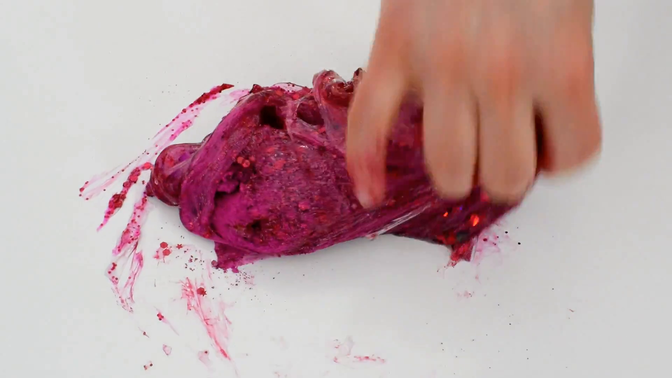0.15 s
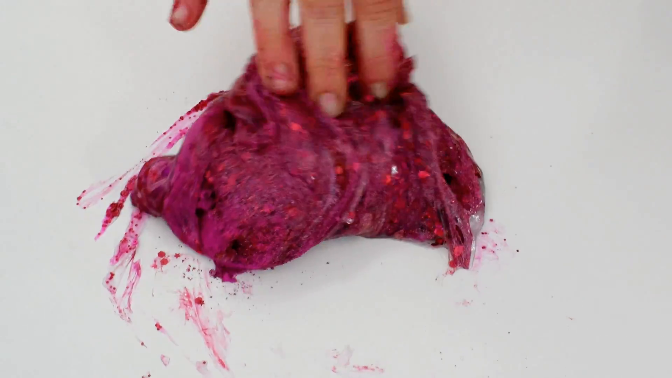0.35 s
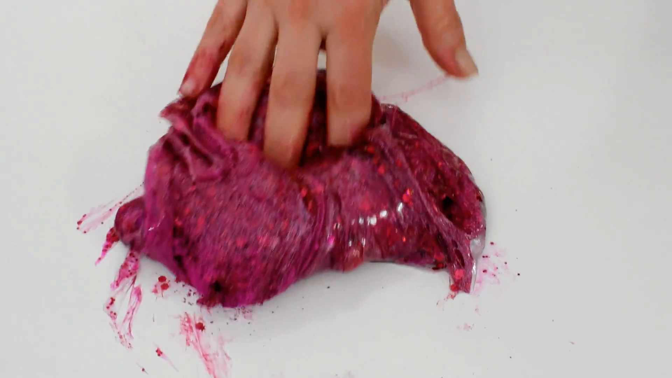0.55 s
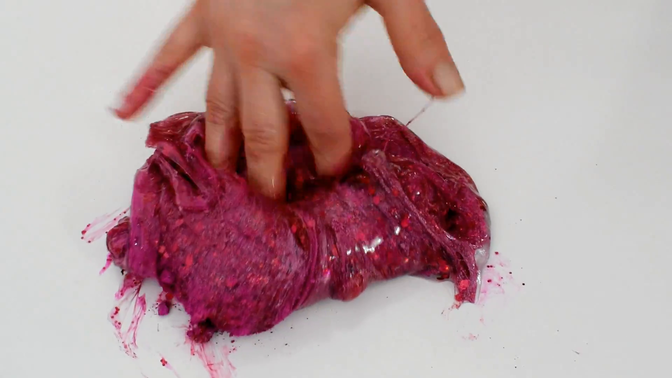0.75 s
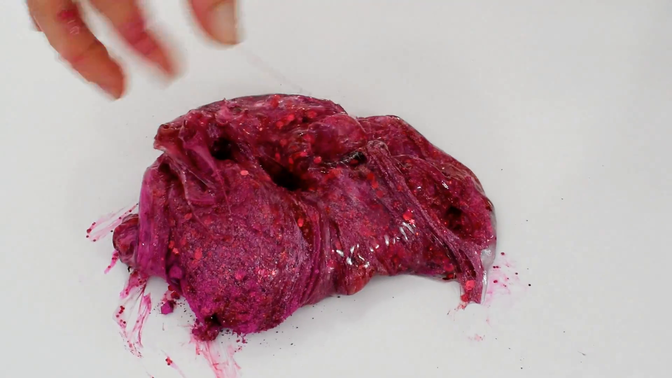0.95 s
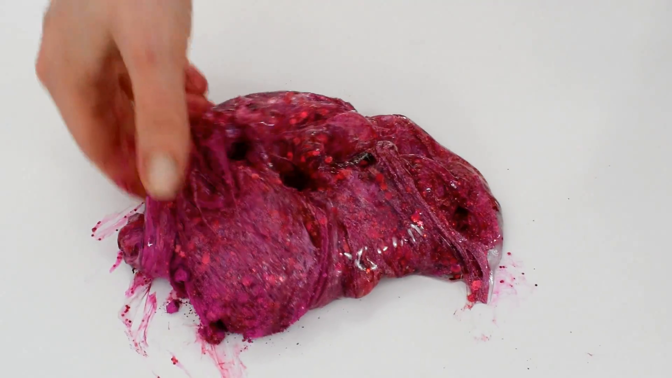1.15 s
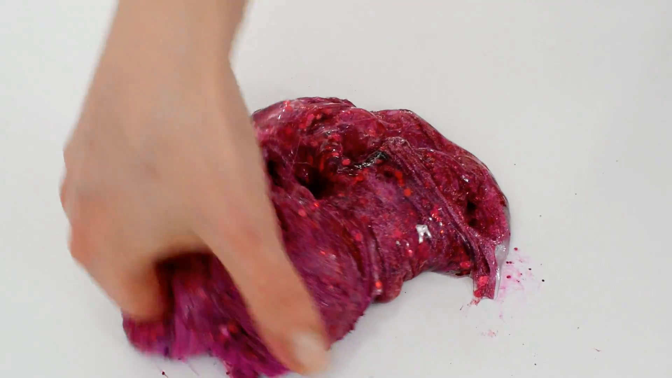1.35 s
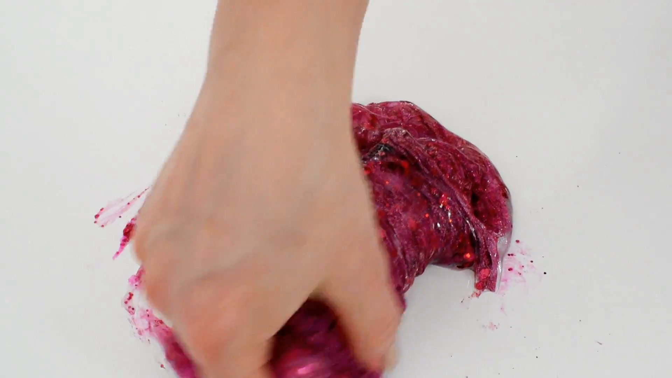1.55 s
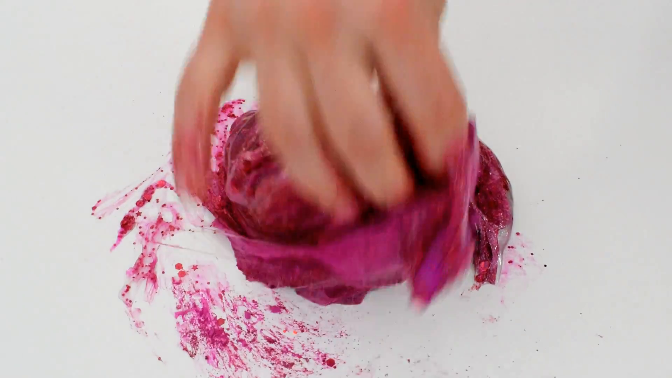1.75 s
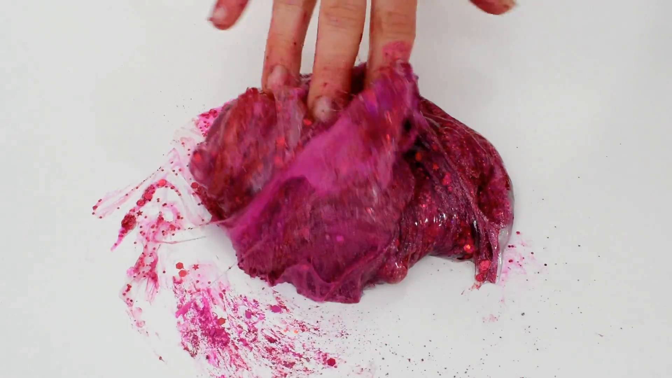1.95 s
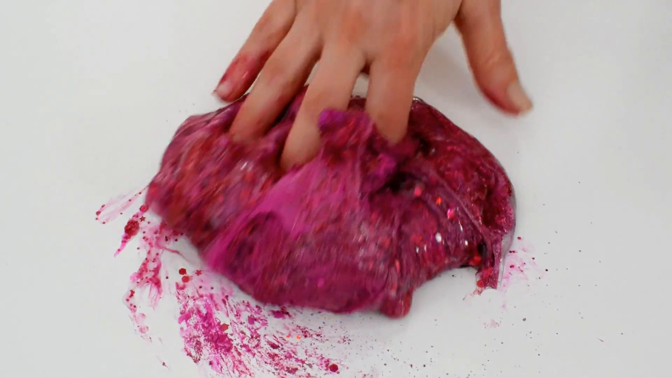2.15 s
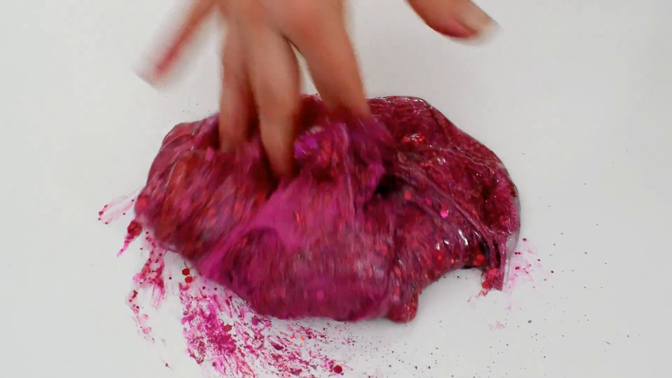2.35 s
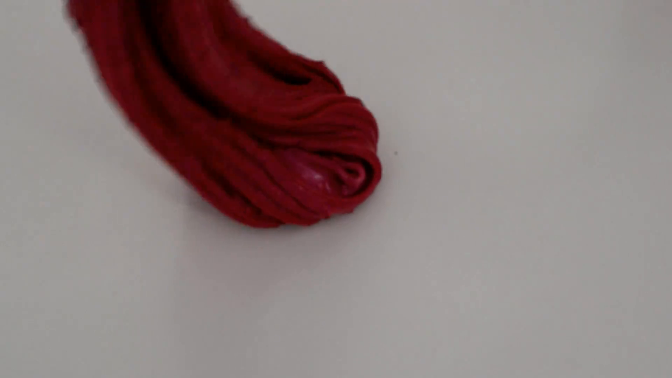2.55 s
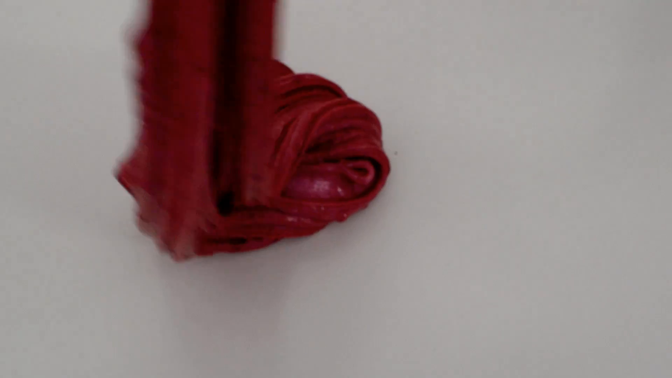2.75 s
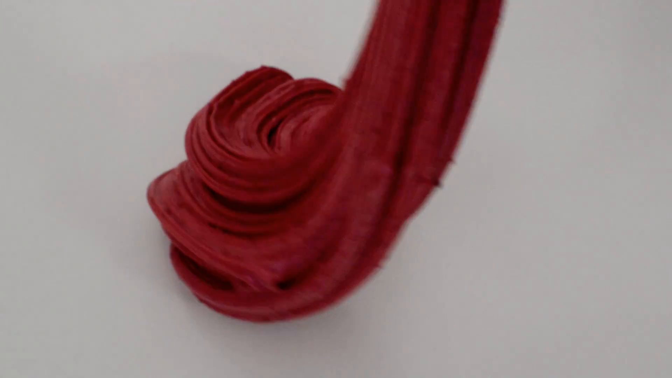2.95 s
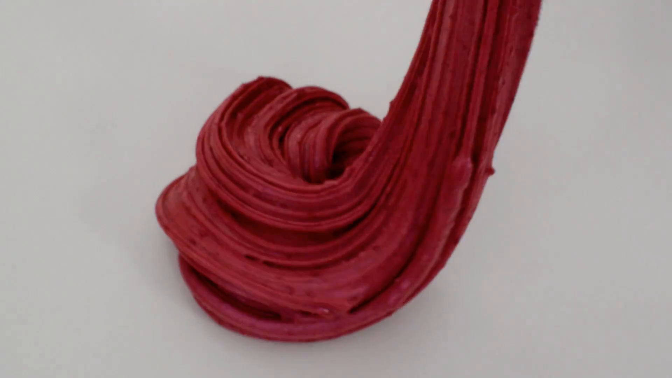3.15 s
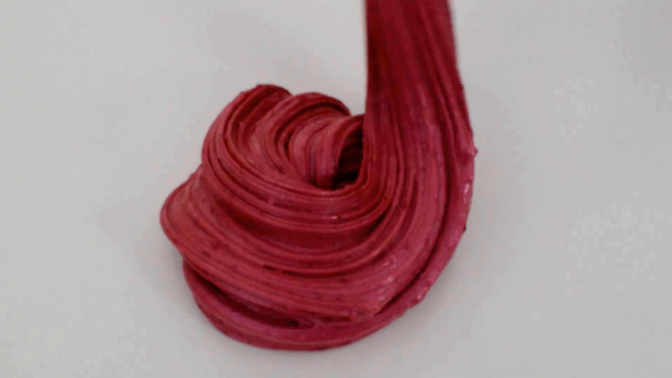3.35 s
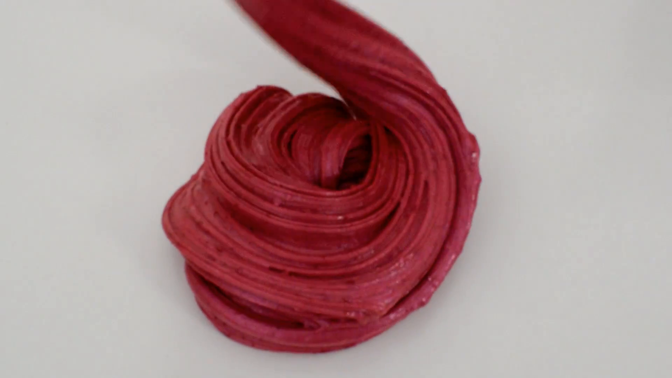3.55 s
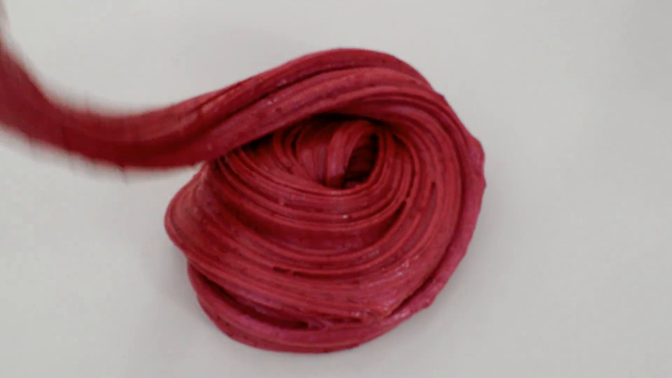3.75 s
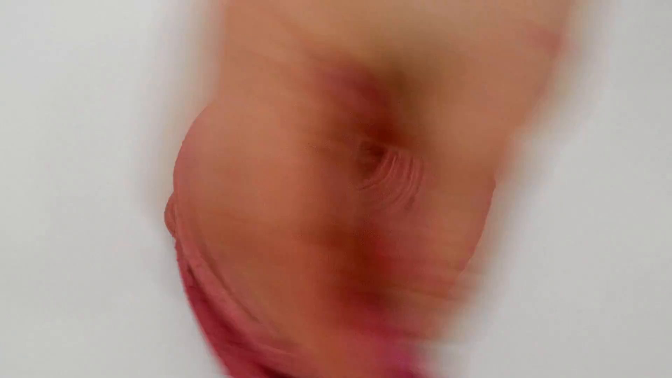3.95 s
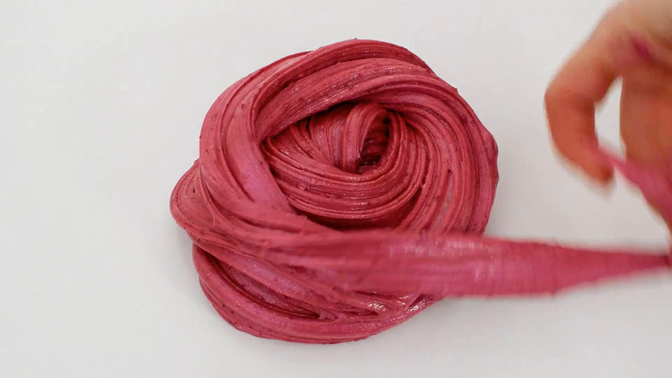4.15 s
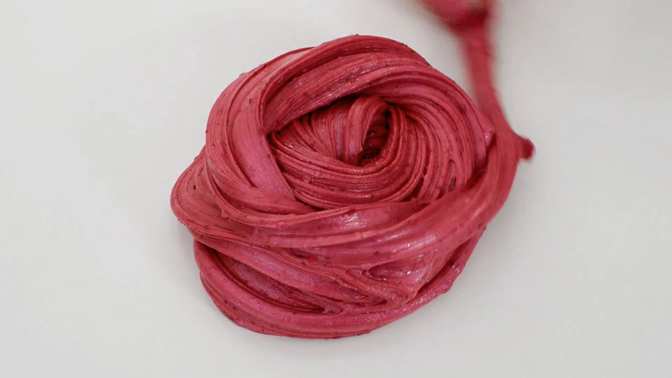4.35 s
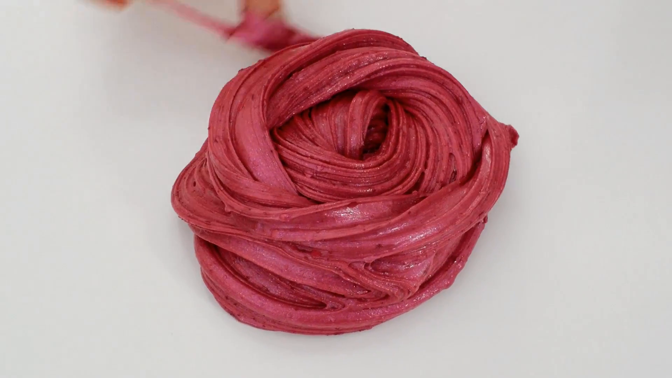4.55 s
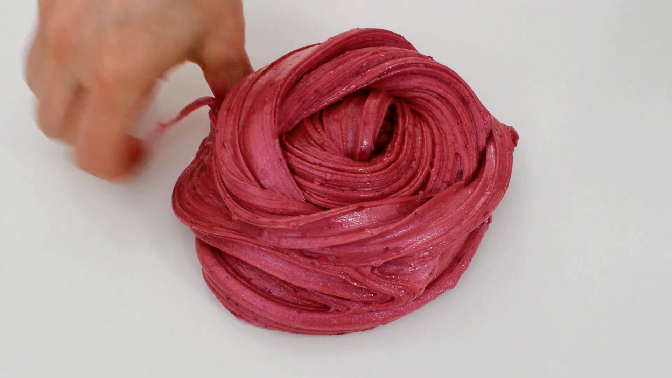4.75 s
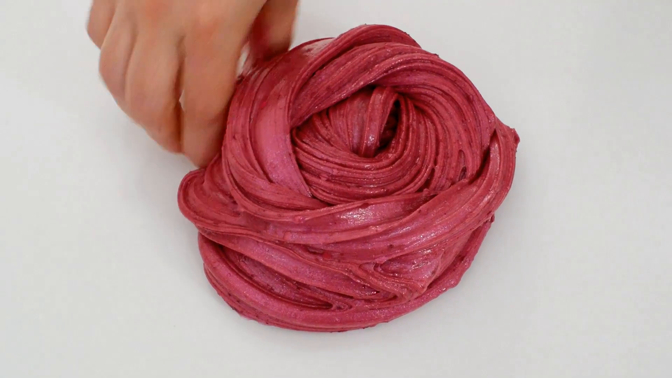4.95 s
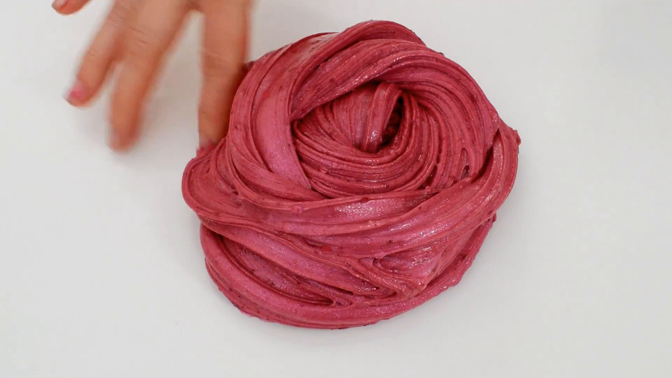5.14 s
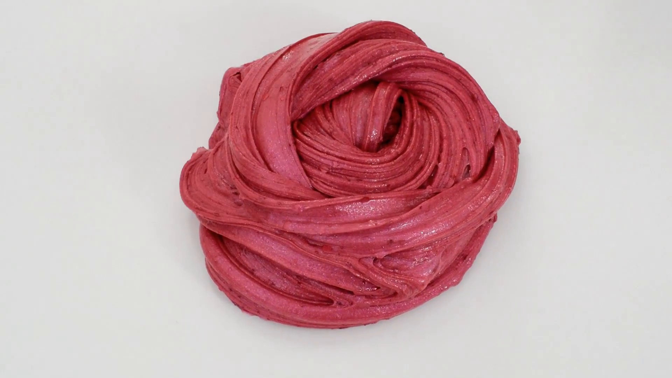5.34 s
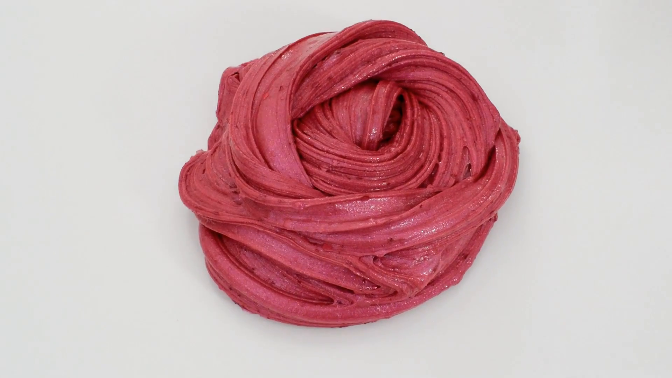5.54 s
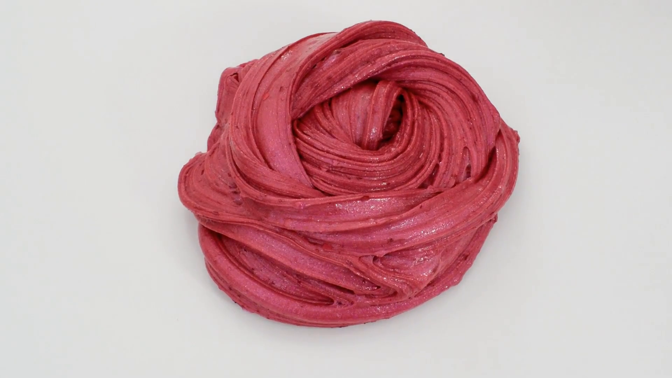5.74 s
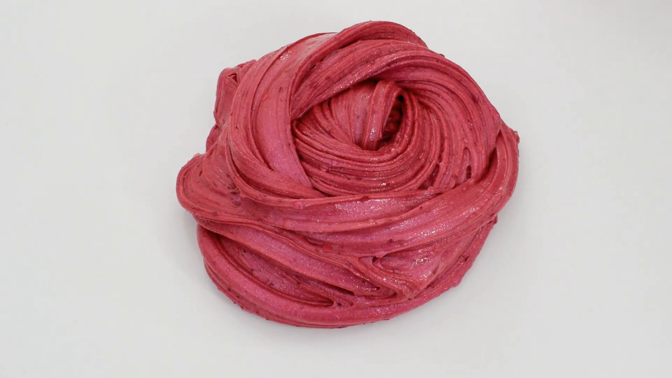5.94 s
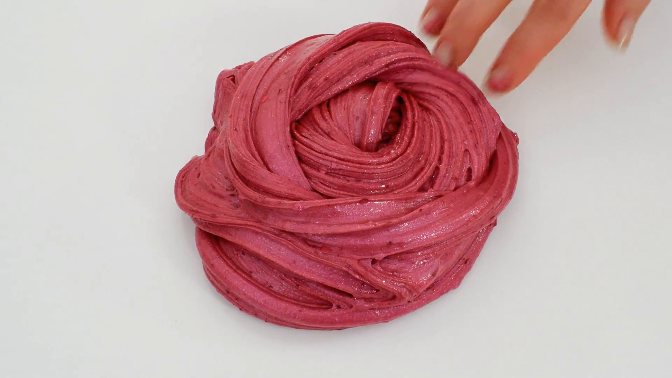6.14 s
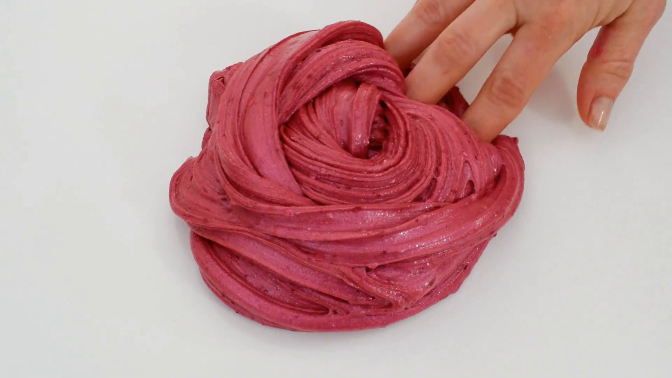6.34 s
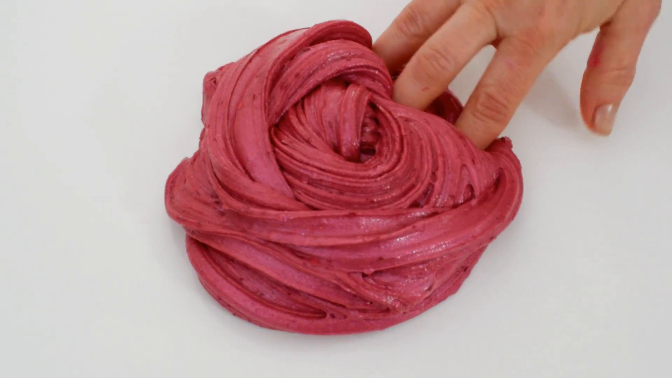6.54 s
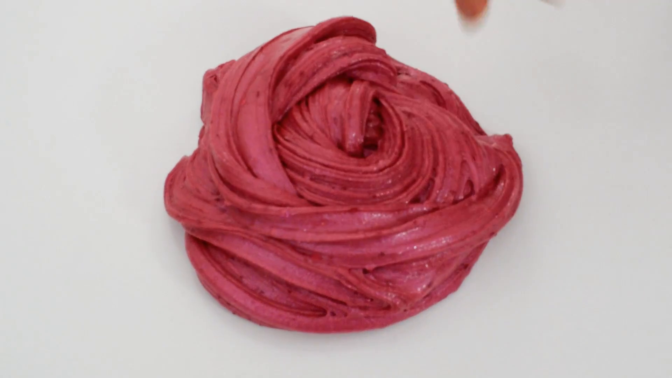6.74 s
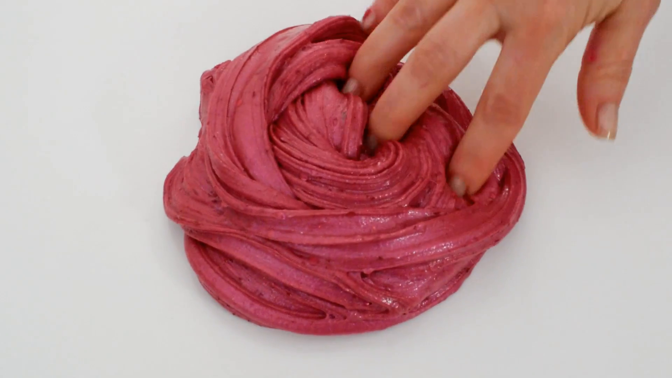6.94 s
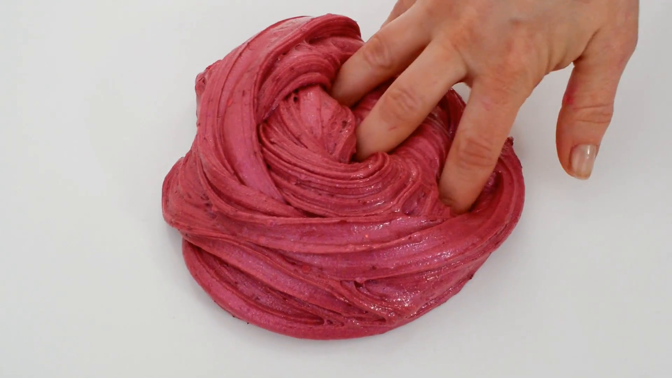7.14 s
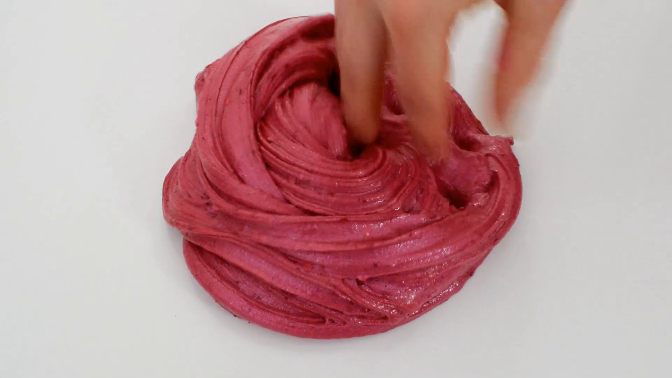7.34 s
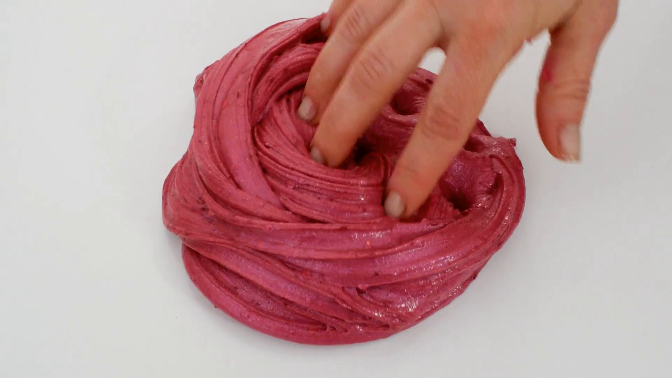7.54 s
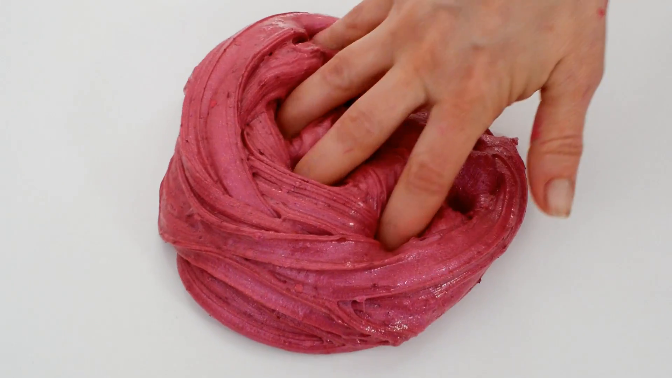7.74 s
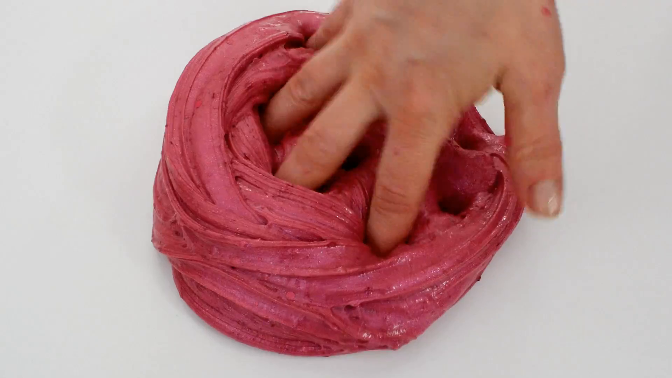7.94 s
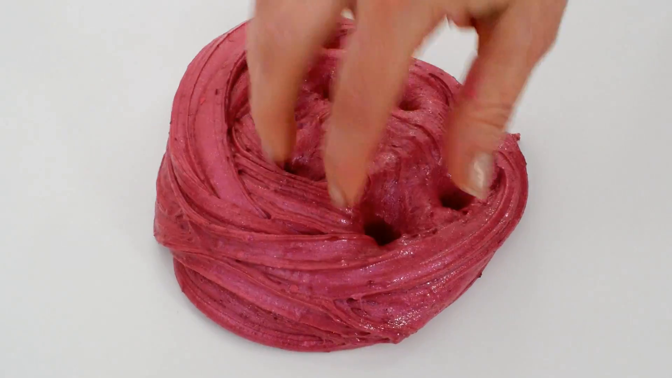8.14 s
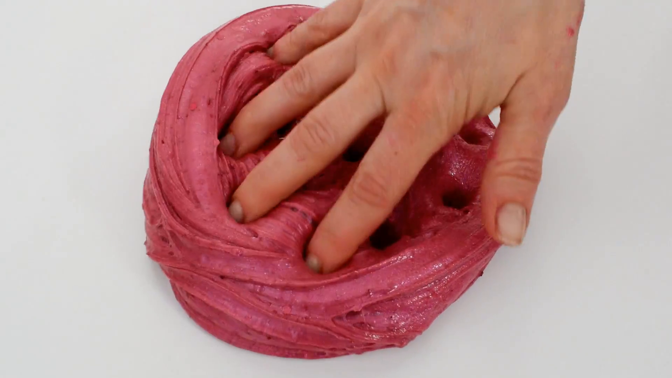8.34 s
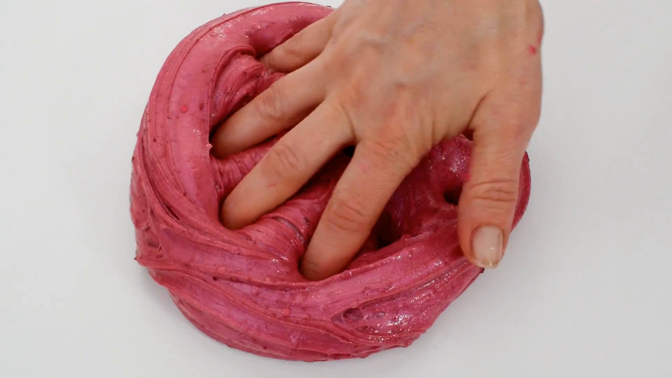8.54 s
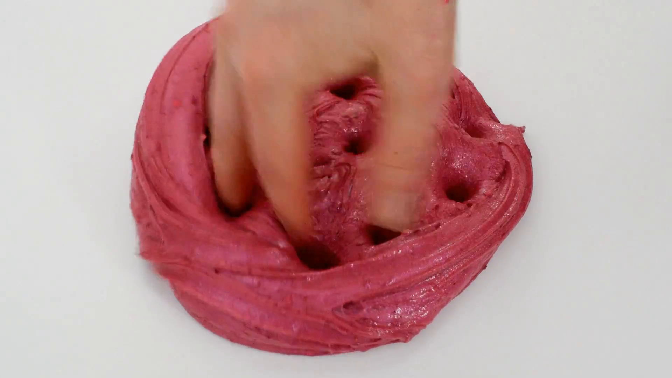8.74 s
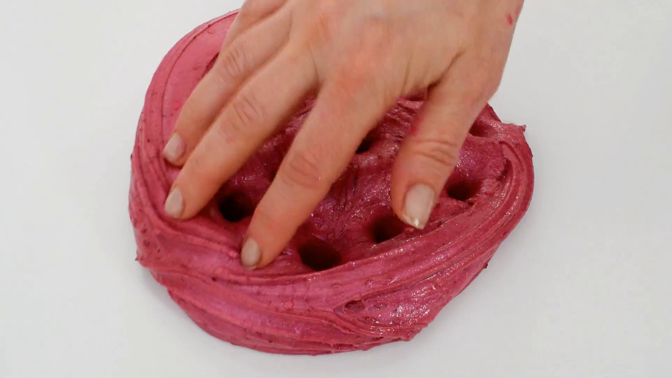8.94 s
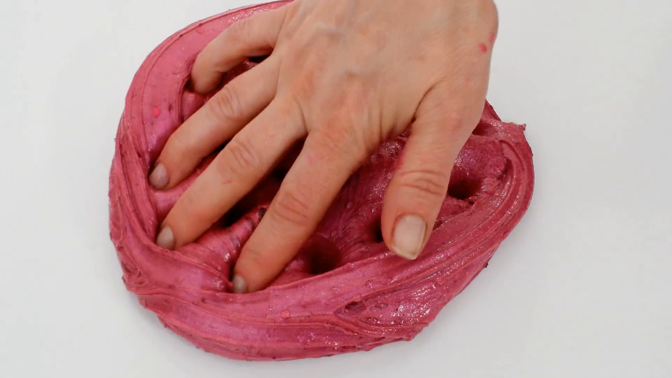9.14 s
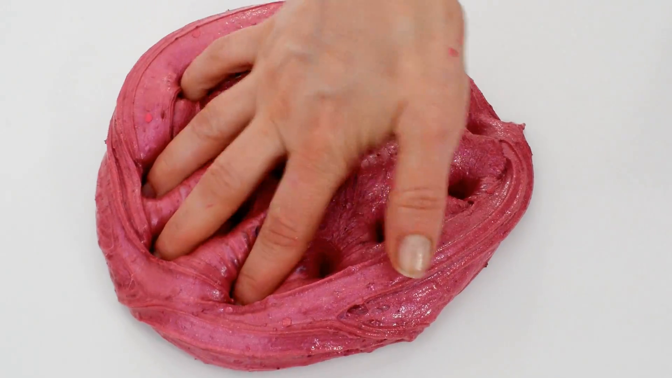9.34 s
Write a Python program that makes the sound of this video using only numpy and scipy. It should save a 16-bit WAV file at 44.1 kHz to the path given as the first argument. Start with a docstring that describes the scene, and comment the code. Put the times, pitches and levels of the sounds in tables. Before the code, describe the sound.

A hand kneads and peels sticky slime on a table in a small dry room, giving irregular sharp pops and fine crackles. After a nearly silent gap come softer sticky snaps, then four very loud wet smacks as fingers pull from deep holes, with dull thuds. Faint air noise and machine hum run beneath; two close spaced microphones.

```python
"""Wet, sticky slime crackles, pops and smacks as hands knead, stretch and poke it on a table in a small dry room.
Bubbles pop as a snapped film and a ringing cavity; tacky film peeling off is a crackle of random tiny breaks.
Four times fingers pull out of deep holes: torn noise, cavity rings and gulps smack loudly enough to overload.
Pushes sway the table in low fading sines, bumps knock dully, and air noise and a machine hum lie beneath.
Two spaced microphones hear each spot through its own direct sound, table bounce, hand scatter and room."""
import sys
import numpy as np
from scipy import signal
from scipy.fft import rfft, irfft
from scipy.io import wavfile

SR = 44100
rng = np.random.default_rng(int(sys.argv[2]) if len(sys.argv) > 2 else 0)


def store_pcm(level_fs):
    """Save levels as 16-bit WAV."""
    pcm = np.round(np.clip(level_fs, -1, 1) * 32767).astype(np.int16)
    wavfile.write(sys.argv[1], SR, np.atleast_2d(pcm).T)


N = 414099
T = np.arange(N) / SR  # time [s]
SHORT = T[:2048]  # time axis of one brief sound [s]
FIRM_DB = -59.5  # crackle level of a firm stroke [dB]


def undb(db):
    """Decibels to gain."""
    return 10 ** (np.asarray(db) / 20)


def unit(x):
    """Scale to an energy of one."""
    return x / np.sqrt(np.sum(x ** 2) + 1e-18)


def level(x, db):
    """Scale to an rms level."""
    return x * undb(db) / np.sqrt(np.mean(x ** 2))


def add(track, s, sound):
    """Mix a sound into a track at a time."""
    i = max(int(s * SR), 0)
    track[..., i:i + sound.shape[-1]] += sound[..., :max(N - i, 0)]


def at_hz(points, hz):
    """Read (frequency [Hz], value) points on a log-frequency axis."""
    f, value = np.transpose(points)
    return np.interp(np.log(hz + 1e-3), np.log(f), value)


def colour(x, points, size=8192):
    """Causal filter of unit energy with the given spectrum, built from its cepstrum."""
    spectrum = undb(at_hz(points, np.fft.rfftfreq(size, 1 / SR)))
    cepstrum = irfft(np.log(spectrum))
    # folding the cepstrum onto positive time makes the filter minimum-phase
    cepstrum[1:size // 2] *= 2
    cepstrum[size // 2 + 1:] = 0
    response = unit(irfft(np.exp(rfft(cepstrum))))
    return signal.oaconvolve(x, response)[:len(x)]


def modes(table, t):
    """A sum of fading sines from rows of (frequency [Hz], level [dB], t60 [s])."""
    total = 0
    for hz, db, t60 in table:
        fade = np.exp(-np.log(1000) * t / t60)
        total = total + undb(db) * np.sin(2 * np.pi * hz * t) * fade
    return total


def ring(hz, cycles, glide=0.):
    """A small resonator that fades in a few cycles; with a glide its pitch rises."""
    age = SHORT * hz / cycles
    pitch = np.minimum(hz * (1 + glide * (np.minimum(age, 2) - .5)), SR / 2)
    phase = 2 * np.pi * np.cumsum(pitch) / SR
    return unit(np.exp(-age) * np.sin(phase))


def rupture(tear_s, rag):
    """A film breaks at once, then its ragged edge tears on for a moment."""
    force = rag * unit(rng.standard_normal(len(SHORT)) * np.exp(-SHORT / tear_s))
    force[0] = 1
    return force


def strike(force, body):
    """A body's answer to a force, with an energy of one."""
    return unit(signal.oaconvolve(force, body)[:len(force)])


def tap(x, ms):
    """The same short sound, a little later."""
    return np.roll(x, int(abs(ms) * SR / 1000))


def near_field(lag_ms, bounce_ms, bounce_db, scatter_db):
    """Direct sound, a bounce off the table top, and scatter from a hand that never lies the same way twice."""
    direct = 1. * (SHORT == 0)
    scatter = unit(rng.standard_normal(len(SHORT)) * SHORT * np.exp(-SHORT / 0.0011))
    bounce = tap(direct, bounce_ms * np.exp(0.14 * rng.standard_normal()))
    path = direct + undb(bounce_db) * bounce + undb(scatter_db) * scatter
    return tap(unit(path), lag_ms)


def place(x):
    """A sound from one spot on the slime: rows for the left microphone, the right one, and the room."""
    left = near_field(lag_ms=0, bounce_ms=0.83, bounce_db=-14, scatter_db=-4.5)
    right_lag_ms = 0.68 + .12 * rng.standard_normal()
    right = near_field(lag_ms=right_lag_ms, bounce_ms=1.3, bounce_db=1.0, scatter_db=-1.5)
    strength = np.sqrt(np.sum(x ** 2))
    return np.array([strike(x, left), strike(x, right), unit(x)]) * strength


def room_tone():
    """Soft air noise, alike on both sides in the bass, and a wavering machine hum."""
    # spectrum of the air noise: (frequency [Hz], relative density [dB per Hz])
    air_spectrum = [(20, -1.5), (40, -2), (70, -10), (100, -5.5), (150, -14.5), (250, -17.5), (450, -25),
                    (900, -26), (2000, -30.5), (4000, -34.5), (10000, -34.5), (16000, -40)]
    # hum of a machine, before the microphone gains: (frequency [Hz], rms level [dB])
    hum_tones = [(91.5, -61.5), (95, -70), (120, -69.5), (242.2, -75), (301.5, -79), (360.7, -71.5)]
    shared = colour(rng.standard_normal(N), air_spectrum)
    bass = signal.sosfilt(signal.butter(1, 900, fs=SR, output="sos"), shared)
    sides = []
    for _ in range(2):
        own = colour(rng.standard_normal(N), air_spectrum)
        sides.append(level(own + .9 * bass, -54.5))
    knots = np.linspace(0, T[-1], num=40)
    hum = 0
    for hz, db in hum_tones:
        waver = np.interp(T, knots, rng.standard_normal(len(knots)))
        hum = hum + level(np.sin(2 * np.pi * hz * T + 1.1 * waver), db)
    return (np.array(sides) + hum) * undb([[-3.0], [2.4]])  # left, right


def room_response():
    """Dense reflections that build up in a few milliseconds; the lows linger in the room's resonances."""
    # decay of the dense reflections: (frequency [Hz], t60 [s])
    decay_times = [(200, 0.41), (550, .32), (1200, 0.13), (3000, 0.14), (8000, .165), (11000, 0.14),
                   (15000, 0.023)]
    # low resonances of the room: (frequency [Hz], relative level [dB], t60 [s])
    resonances = [(207, -6.5, 0.27), (280, -6, 0.18), (351.4, -5, 0.45), (447, -2.5, 0.23),
                  (522, -1.5, 0.4), (568, -2, 0.14), (752, 3, .18)]
    t = T[:SR // 2]
    # noise that fades at its own rate in each frequency band
    hz, age, cells = signal.stft(rng.standard_normal(len(t)), SR, nperseg=128)
    fade = np.exp(-np.log(1000) * age / at_hz(decay_times, hz)[:, None])
    tail = signal.istft(cells * fade, SR)[1][:len(t)]
    build_up = np.clip((t - .003) / 0.0079, 0, 1)
    reflections = undb(-12.5) * unit(tail * build_up)
    return reflections + undb(-27.0) * unit(modes(resonances, t) * build_up)


def table_sway():
    """Soft pushes rock the table, and the microphones with it."""
    # pushes that sway the table: (time [s], relative level [dB])
    pushes = [(0.0, -43), (0.491, -41.5), (0.8, -44.5), (1.148, -44), (2.434, -32), (4.931, -37.5),
              (5.072, -50), (6.278, -48.5), (6.663, -23.5), (7.346, -26.5), (8.035, -21.5), (8.745, -25.5)]
    # the table's sway and low rings: (frequency [Hz], relative level [dB], t60 [s])
    sway_modes = [(21.89, 2.5, 0.93), (37, -16, .45), (47.3, -9.5, 0.95), (61.45, -18, .35),
                  (90, -23.5, .2)]
    out, t = np.zeros(N), T[:SR]
    for s, db in pushes:
        soft_onset = 1 - np.exp(-t / 0.01)
        add(out, s, undb(db) * modes(sway_modes, t) * soft_onset)
    return out * undb([[-2.5], [1.5]])  # left, right


def thuds():
    """The hand bumps the table through the slime, which cushions each bump into a short, dull knock."""
    # bumps: (time [s], energy [dB])
    bumps = [(0.298, -38), (0.821, -14.5), (1.165, -16), (2.377, -18.5), (4.805, -28), (6.655, -7),
             (7.335, -6.5), (8.035, -12), (8.747, -10.5)]
    out = np.zeros((3, N))
    for s, db in bumps:
        add(out, s, place(undb(db) * ring(122, cycles=0.99)))
    return out


def swell(start, length, attack_s, release_s):
    """Attack, hold and release, with exponential flanks."""
    before = np.maximum(start - T, 0)
    after = np.maximum(T - start - length, 0)
    return np.exp(-before / attack_s - after / release_s)


def strokes():
    """Gains of crackle and squish as the hand takes hold, peels steadily and lets go."""
    # strokes that peel slime off skin or table:
    # (start [s], length [s], relative fine crackle level [dB], relative duller squish level [dB])
    peel_strokes = [(0.006, .045, -61, -55.5), (0.064, .055, -67, -60), (0.231, .17, -72, -70),
                    (0.777, 0.037, -62, -65.5), (0.836, 0.016, -45, -50.5), (1.215, .28, -58.5, -64),
                    (1.566, .13, -60, -59), (1.758, .2, -74.5, -70.5), (2.023, .18, -70.5, -67.5),
                    (2.366, 0.023, -58.5, -50.5), (2.425, .06, -68, -68.5), (4.082, 0.18, -71.5, -63.5),
                    (4.269, .04, -58, -56), (4.325, 0.12, -57.5, -51), (4.753, .12, -70.5, -65),
                    (4.937, 0.072, -58, -56.5), (5.182, 0.0095, -51.5, -54)]
    gains = np.full((2, N), 1e-6)
    for s, length, crackle_db, squish_db in peel_strokes:
        # the grip builds, holds and lets go
        grip = swell(s, length, attack_s=0.022, release_s=0.024)
        gains = np.maximum(gains, undb([[crackle_db], [squish_db]]) * grip)
    return gains


def pulls():
    """Gains of crackle and squish as a finger hole's seal strains, then breaks in a wet spray."""
    # fingers pulled out of deep holes: (seal breaks [s], spray length [s], relative level of the straining
    # seal [dB], relative spray crackle level [dB], relative squelch level [dB])
    finger_pulls = [(6.641, .022, -56, -48, -42.5), (7.3243, .034, -52, -36, -33.5),
                    (8.02, .028, -40.5, -27.5, -36), (8.7404, 0.027, -40, -28.5, -41)]
    gains = np.zeros((2, N))
    for s, length, strain_db, spray_db, squelch_db in finger_pulls:
        # the seal strains most just before it breaks, lifting crackle and squish alike
        gains += undb(strain_db) * swell(s - .023, 0, attack_s=0.013, release_s=.007)
        spray = swell(s, length, attack_s=0.0027, release_s=0.0047)
        gains += undb([[spray_db], [squelch_db]]) * spray
    return gains


def grains(rate, spread_db):
    """Random tiny breaks, many weak and a few strong, with an rms of one."""
    chance, size, sign = rng.random((3, N))
    sizes = undb(spread_db * np.minimum(-np.log(size + 1e-9), 4))
    breaks = chance < rate / SR  # rate in breaks per second
    return level(breaks * sizes * np.sign(sign - .5), 0)


def peeling(gains, count=4):
    """Sticky threads and microbubbles break in quick spurts, at several spots, as slime parts from a surface."""
    # spectra of the fine crackle and the duller squish: (frequency [Hz], relative density [dB per Hz])
    crackle_spectrum = [(1500, -11), (3000, -3), (4900, 1.5), (6800, -0.5), (9000, 0), (12000, -4),
                        (16000, -10)]
    squish_spectrum = [(100, -13), (200, -4), (450, 0), (1000, 3.5), (1400, -5), (1950, 1.5), (3000, -8),
                       (6000, -21)]
    crackle_db, squish_db = 20 * np.log10(gains)
    # a light touch slides evenly, a firm one sticks and slips
    grip = np.clip(1.5 + (crackle_db - FIRM_DB) / 12, 0, 1)
    knots = np.linspace(0, T[-1], num=1100)
    wander = np.clip(rng.standard_normal(len(knots)), -2, 2)
    spurts_db = 6 * grip * np.interp(T, knots, wander)
    out = 0
    for _ in range(count):
        crackle = colour(grains(rate=1500 / count, spread_db=3.5), crackle_spectrum) * undb(crackle_db - 3.5)
        squish = colour(grains(rate=2200 / count, spread_db=4.0), squish_spectrum) * undb(squish_db - 2.5)
        out = out + place(crackle * undb(spurts_db) + squish)
    return out / np.sqrt(count)


def tiny_bubbles(crackle, count=400):
    """Faint bubbles burst at random while slime is peeled, louder under a firmer hand; rows as for larger ones."""
    base_db, follow, spread_db = -28, .55, 14  # energy [dB], dB per dB of crackle, spread [dB]
    rows = []
    for when, cavity, snap, weak_cavity, weak_snap in rng.random((count, 5)):
        effort_db = 20 * np.log10(crackle[int(when * N)]) - FIRM_DB
        if effort_db > -15:
            db = base_db + follow * effort_db
            cavity_hz, snap_hz = 1700 * 2.4 ** cavity, 7000 * 1.76 ** snap
            rows.append((when * N / SR, cavity_hz, db - spread_db * weak_cavity,
                         snap_hz, db - spread_db * weak_snap))
    return rows


def pops(tiny):
    """Each bursting bubble gives a bare tick, snaps its film and rings the little cavity behind it."""
    # the larger bubbles: (time [s], cavity pitch [Hz], cavity energy [dB],
    # pitch of the film's snap [Hz], relative snap energy [dB])
    larger = [(0.0085, 1500, -22, 8300, -34.5), (0.2343, 4780, -48.5, 7600, -36),
              (0.4202, 2520, -31, 11400, -18.5), (0.4813, 1750, -31, 12400, -24.5),
              (0.6916, 5250, -20.5, 6900, -27.5), (0.7415, 1750, -29, 11000, -58),
              (0.7885, 5000, -20, 8600, -18), (0.856, 832, -31, 9140, -16), (0.875, 2000, -23, 9700, -27),
              (0.9192, 1120, -26, 9700, -21), (1.1573, 2160, -19.5, 7500, -24),
              (1.2157, 4870, -27, 13140, -17), (1.2745, 4950, -39, 8900, -21.5),
              (1.3154, 4680, -39, 10700, -13), (1.3453, 5000, -16.5, 9800, -13),
              (1.4052, 2110, -31, 10200, -22), (1.487, 5040, -9, 10900, -10.5),
              (1.56, 5000, -22.5, 8600, -40), (2.0035, 3740, -27.5, 12600, -18),
              (2.0088, 3600, -27, 12400, -14), (2.0804, 2570, -29, 7800, -15.5),
              (2.1896, 3730, -27, 7630, -20.5), (2.3602, 3260, -11.5, 9470, -5.5),
              (2.3982, 1580, -22, 7150, -14.5), (2.431, 810, -23.5, 7800, -38),
              (3.4727, 780, -34, 7100, -44), (4.0826, 5660, -26.5, 7160, -35),
              (4.264, 1760, -27, 7700, -37), (4.3203, 1190, -19.5, 6600, -26),
              (4.4194, 1930, -46, 10600, -24), (4.6812, 5030, -32, 9200, -31.5),
              (4.7296, 4830, -19, 10700, -12.5), (4.8054, 1970, -18.5, 8500, -24),
              (4.8499, 2500, -17, 8500, -16), (4.9315, 1850, -22, 10600, -22),
              (5.0016, 2070, -36, 9500, -22), (5.1907, 5400, -21, 8340, -21.5),
              (5.2267, 5470, -36, 8700, -30), (5.2382, 5470, -33, 8700, -31),
              (6.243, 894, -24.5, 10500, -22.5), (6.6221, 1880, -16, 7350, -10.5),
              (7.0284, 786, -38, 12100, -20.5), (7.1024, 3800, -18.5, 9780, -6.5),
              (7.14, 5700, -40, 6700, -28), (7.2888, 1580, -29, 10690, -22.5),
              (7.6328, 720, -19.5, 10900, -14.5), (7.6574, 4140, -22.5, 10340, -24),
              (7.729, 1850, -10, 7740, -7.5), (8.3883, 3900, -17, 7830, -19),
              (8.289, 718, -42, 12880, -28.5), (8.4225, 780, -20, 7680, -40.5),
              (8.5024, 1030, -33, 11940, -29.5), (8.7154, 733, -11, 7640, -31),
              (9.0474, 724, -43, 12800, -14), (9.1849, 1910, -15.5, 7600, -20.5),
              (9.2456, 2096, -39.5, 10200, -26.5)]
    out = np.zeros((3, N))
    for s, cavity_hz, cavity_db, snap_hz, snap_db in [*larger, *tiny]:
        cavity = strike(rupture(tear_s=0.00017, rag=0.11), ring(cavity_hz, cycles=0.85, glide=0.0087))
        snap_body = np.diff(ring(snap_hz, cycles=0.97), prepend=0)
        snap = strike(rupture(tear_s=0.0021, rag=0.44), snap_body)
        tick = strike(rupture(tear_s=0.00015, rag=0.74), ring(4700, cycles=0.68))
        tick_db = (cavity_db + snap_db) / 2 - 7
        burst = undb(cavity_db) * cavity + undb(snap_db - 0.75) * snap - undb(tick_db) * tick
        add(out, s, place(burst))
    return signal.sosfilt(signal.butter(1, 400, "hp", fs=SR, output="sos"), out)


def smacks():
    """A finger hole tears open: a broad crack, rings of hole and table, a gulp of air, a spray of wet bubbles."""
    # finger holes letting go of their suction: (time [s], relative energy [dB], cavity pitch [Hz],
    # gulp pitch [Hz], relative gulp energy [dB], relative table ring on top of the smack's energy [dB])
    releases = [(6.6406, -0.5, 2670, 665, -7.5, -6), (6.658, 9.5, 2706, 533, 4.5, -0.5),
                (7.3231, 10, 4080, 576, 1.5, -5), (7.3386, 10, 1044, 724, 3.5, -5.5),
                (7.34, 10, 1030, 745, 0.5, -3), (7.3563, 8, 1800, 569, 7.5, -4),
                (8.018, 13, 7380, 576, -1, -6.5), (8.0362, 9, 1030, 262, 2.5, -4),
                (8.0419, 4.5, 990, 268.5, 8, -3), (8.7404, 8.5, 6030, 603, 7, -5),
                (8.7471, 4, 1923, 424, 1.5, 0), (8.7684, 7, 2800, 274, 4.5, -3)]
    # spectrum of the tearing crack: (frequency [Hz], relative density [dB per Hz])
    tear_spectrum = [(100, -11.5), (250, -10.5), (600, 3), (1050, -12), (1450, -8.5), (1850, 4.5),
                     (2300, -9.5), (2800, -5), (4500, -3), (8000, -6.5), (11000, -9), (16000, -19.5)]
    # the table top, rung by the smacks: (frequency [Hz], relative level [dB], t60 [s])
    top_modes = [(1030, -2.5, 0.021), (1190, -0.5, 0.016), (1850, -5, 0.007), (2757, -1.5, 0.063),
                 (3750, -2, 0.012), (4610, 4.5, 0.014)]
    out = np.zeros((3, N))
    for s, db, cavity_hz, gulp_hz, gulp_db, ring_db in releases:
        crack = unit(colour(rupture(tear_s=0.0014, rag=0.9), tear_spectrum))
        cavity = ring(cavity_hz, cycles=1.7, glide=0.033)
        add(out, s, place(undb(db) * (undb(0.75) * crack + undb(-5.5) * cavity)))
        gulp = ring(gulp_hz, cycles=1.5, glide=0.35)
        add(out, s, place(undb(gulp_db - 4.5) * gulp))
        # the broad table top radiates to both microphones at once
        table_top = strike(rupture(tear_s=0.00011, rag=.3), modes(top_modes, SHORT))
        add(out, s + .001, table_top * undb(db + ring_db + np.array([[-10], [-7], [-7]])))
        for when, pitch, weakness in rng.random(size=(4, 3)):
            bubble = ring(900 * 8 ** pitch, cycles=2.2, glide=0.075)
            add(out, s + .012 * when, place(undb(db - 15.5 - 12 * weakness) * bubble))
    return signal.sosfilt(signal.butter(4, 215, "hp", fs=SR, output="sos"), out)


def scene():
    """The slime lies nearer the left microphone; the right one is the more sensitive."""
    # tone colour of the left microphone: (frequency [Hz], relative level [dB])
    left_colour = [(200, -3.5), (700, 1.5), (2000, 1.5), (4300, 1.5), (8000, 4.5), (13000, 0.5)]
    hand = strokes()
    crackling = peeling(hand + pulls())
    popping = pops(tiny_bubbles(hand[0]))
    left, right, slime = thuds() + crackling + popping + smacks()
    # each microphone hears its own pattern of reflections
    left = colour(left + signal.fftconvolve(slime, room_response())[:N], left_colour)
    right = (right + signal.fftconvolve(slime, room_response())[:N]) * undb(4.0)
    return room_tone() + table_sway() + np.array([left, right])


def record(dry):
    """The loudest peaks clip just below full scale; then the top is cut above 16.2 kHz."""
    clipped = np.clip(dry, -.95, .95)
    return signal.sosfilt(signal.ellip(12, .1, 90, 16200, fs=SR, output="sos"), clipped)


dry = scene()
out = record(dry)
store_pcm(out)
```